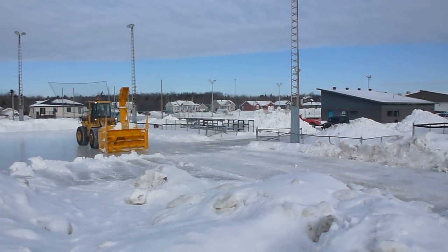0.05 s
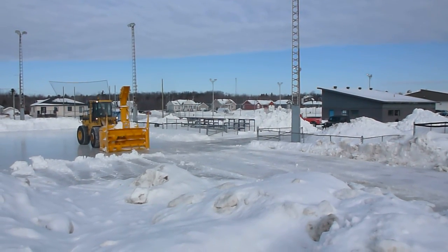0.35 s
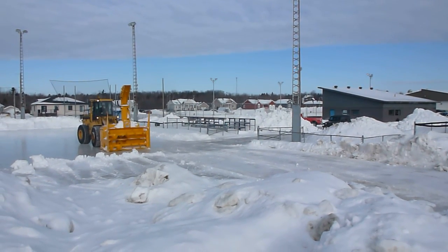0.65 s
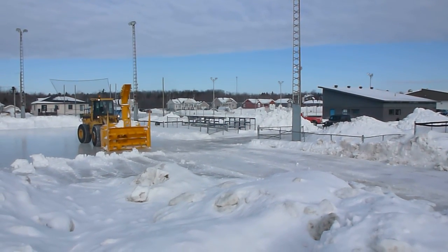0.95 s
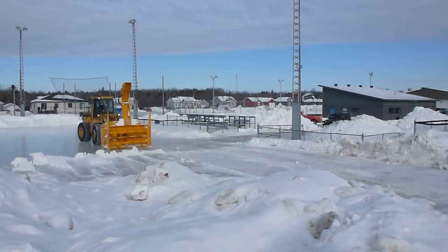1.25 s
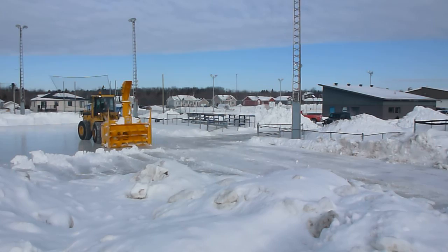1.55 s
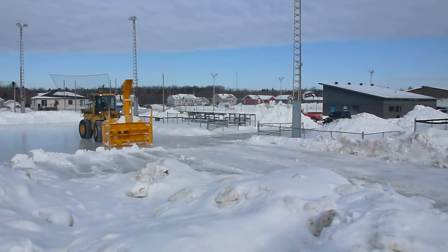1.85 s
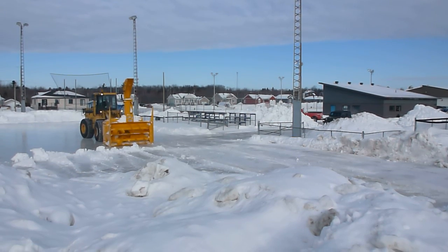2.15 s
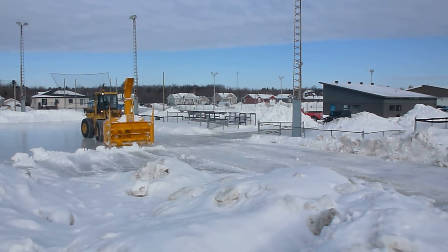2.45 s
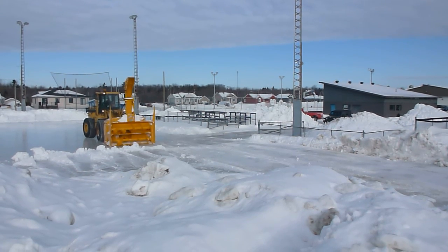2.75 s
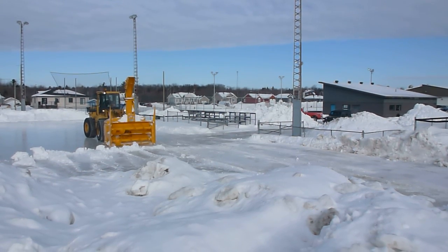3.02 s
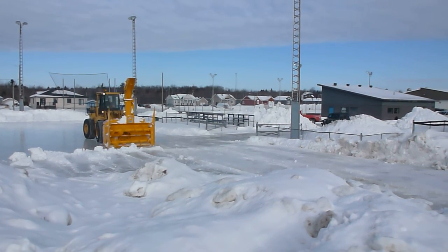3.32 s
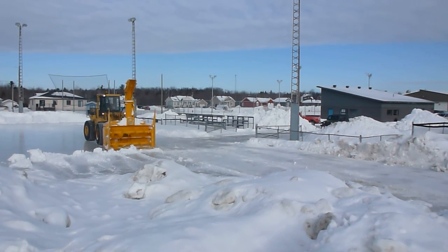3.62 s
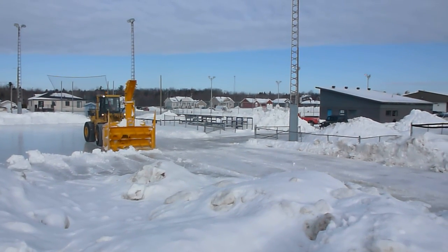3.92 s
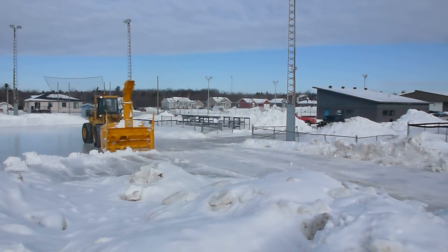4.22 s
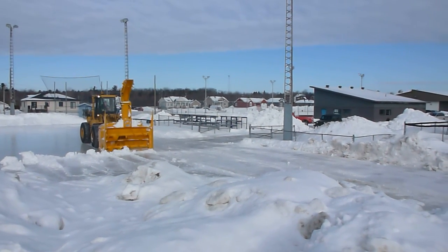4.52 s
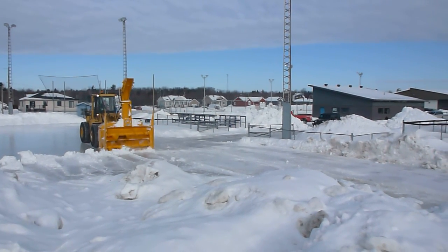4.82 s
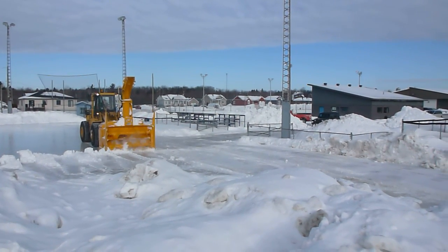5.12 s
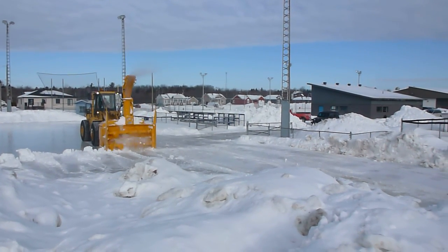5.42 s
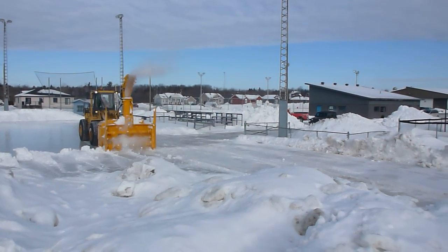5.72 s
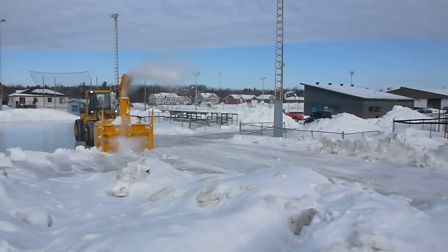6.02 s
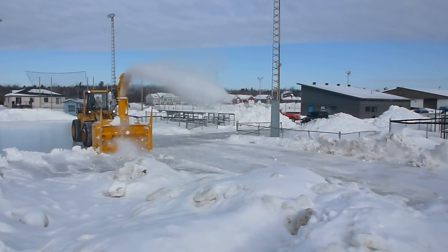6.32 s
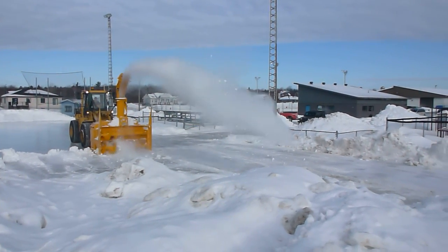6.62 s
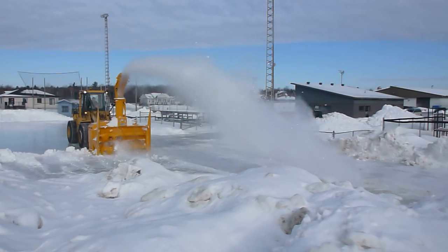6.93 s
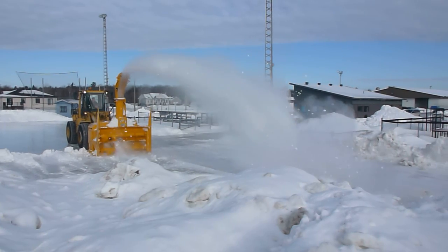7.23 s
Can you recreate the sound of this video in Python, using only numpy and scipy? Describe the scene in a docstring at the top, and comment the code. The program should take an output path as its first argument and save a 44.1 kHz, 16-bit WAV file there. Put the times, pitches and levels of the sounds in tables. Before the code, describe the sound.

A diesel snow blower on a wheel loader runs at full speed on an outdoor ice rink, straight ahead and some way off. Its drone throbs quickly throughout, with a rough clatter and thin, wavering whines. The cutting edge hisses faintly over the ice, briefly louder and brighter around 2 seconds. Stray ice lumps tick against steel at about 0.9, 1.5, 2.4 and 3.4 seconds.

At about 4.7 seconds the auger bites into a snowbank. A loud, gritty hiss of snow leaving the chute starts suddenly, over hollow churning that swells into short howls as thick wads pass through. Lumps crack against the metal more often. The engine pitch sags slightly, lowest near 5.7 seconds, and recovers by 6.6 seconds. The rushing spray and drone continue until the end at about 7.5 seconds. The highest treble is dulled.

```python
"""A diesel snow blower on a wheel loader runs at full speed across an ice rink, some way off.
Its exhaust and cooling fan drone and throb against each other while the cutting edge scrapes
over the ice and stray lumps hit the steel. Then the auger, the screw that feeds snow in, bites
into a snowbank: the engine sags, and snow and lumps rush through the chute."""
import sys
import numpy as np
from scipy import signal
from scipy.fft import rfft, irfft, next_fast_len
from scipy.io import wavfile
from scipy.ndimage import uniform_filter1d

SR = 44100
rng = np.random.default_rng(int(sys.argv[2]) if len(sys.argv) > 2 else 0)


def to_wav(sig):
    """Store sig (one row per channel, or 1-D mono) as 16-bit WAV at the path in sys.argv[1].

    Samples outside -1..1 are clipped; the rate is SR.
    """
    pcm = np.clip(np.atleast_2d(sig), -1, 1) * 32767
    pcm = np.round(pcm).astype(np.int16)
    wavfile.write(sys.argv[1], SR, pcm.T)  # frames by channels


N = 329427
T = np.arange(N) / SR
BITE_S = 4.67  # the auger meets the snowbank


def amp(db):
    """Turns decibels into a number to multiply by."""
    return 10 ** (np.asarray(db) / 20)


def unit(x):
    """Scales x to an average strength (rms) of 1."""
    return x / np.sqrt(np.mean(x ** 2) + 1e-20)


def curve(rows):
    """Joins (time_s, value) rows with straight lines."""
    return np.interp(T, *np.transpose(rows))


def shape(points, hz):
    """The gain at each pitch, read from (pitch_hz, gain_db) rows."""
    pitch_hz, gain_db = np.transpose(points)
    return amp(np.interp(np.log(hz + 1), np.log(pitch_hz), gain_db))


def colour(x, points):
    """Turns the pitches in x up or down by (pitch_hz, gain_db) rows."""
    size = next_fast_len(N)
    return irfft(rfft(x, size) * shape(points, np.fft.rfftfreq(size, 1 / SR)), size)[..., :N]


def wander(rate_hz):
    """A smooth random drift of strength 1, changing up to about rate_hz times a second."""
    size = 4096
    hz = np.fft.rfftfreq(size, T[-1] / size)
    slow = irfft(rfft(rng.standard_normal(size)) / (1 + (hz / rate_hz) ** 4))
    return unit(np.interp(T, np.linspace(0, T[-1], size), slow))


def swell(peak_s, half_length_s):
    """A smooth rise to 1 and back."""
    return np.exp(-((T - peak_s) / half_length_s) ** 2)


def rush(points, patchy_db):
    """Gusty noise in three rows: direct, scattered left and scattered right."""
    _, _, spectrum = signal.stft(rng.standard_normal((3, N)), SR, nperseg=512)
    patches = uniform_filter1d(rng.standard_normal(spectrum.shape[1:]), size=8, axis=0)  # 700 Hz wide
    patches = uniform_filter1d(patches, size=7, axis=1)  # 40 ms long
    gusty = signal.istft(spectrum * amp(patchy_db * unit(patches)), SR, nperseg=512)[1][:, :N]
    return unit(colour(gusty, points))


def blower_load(fill_s=1.3):
    """How full the blower is: 0 until the bite, then rising steadily to 1."""
    return np.clip((T - BITE_S) / fill_s, 0, 1)


def auger(turns):
    """Swings between -1 and 1 with each turn of the auger, about three times a second."""
    return np.cos(2 * np.pi * turns * .0681)


def rotor(turns, tones, fade_db, rough, smear):
    """One pulse a turn makes a stack of tones that fade in the wind; high ones flutter most."""
    load, out = blower_load(), np.zeros(N)
    for multiple, level_db, load_change_db in tones:
        angle = 2 * np.pi * multiple * turns + smear * multiple ** 2 * rng.standard_normal()
        level = amp(level_db + load_change_db * load + fade_db * wander(2.0))
        flutter = rough * multiple * (1 + 1.2 * load)
        tone = (1 + flutter * wander(9.3)) * np.sin(angle)
        out -= level * (tone + flutter * wander(16) * np.cos(angle))
    return out


# How fast the blower's engine turns: time_s, turns_per_s
ENGINE_SPEED = [(0, 46.2), (3, 46.36), (3.5, 46.27), (4.75, 46.41), (5.7, 45.48), (6, 45.72), (6.65, 46.75),
                (7.15, 46.68), (7.47, 46.14)]
def engine_speed():
    """The engine sags in the snowbank, then its speed control overshoots."""
    return curve(ENGINE_SPEED)


# The exhaust's tones: times_engine_speed, level_db, load_change_db
EXHAUST_TONES = [(1, -41.5, 1.5), (2, -33.5, -3), (3, -29.5, -2), (4, -30, -5.5), (5, -28, -0.5),
                 (6, -24.5, -11), (7, -58, 4), (8, -40, 3.5), (9, -51.5, 1), (10, -39.5, -9),
                 (11, -45.5, 7), (12, -43, -6), (14, -42.5, -6.5), (15, -51, 6.5)]
def exhaust(turns):
    """Puffs of exhaust blend into a drone that gets quieter when the engine slows."""
    speed_change = engine_speed() - np.median(engine_speed())
    return rotor(turns, EXHAUST_TONES, fade_db=0.68, rough=0.016, smear=0.012) * amp(2.9 * speed_change)


# The fan's tones: times_fan_speed, level_db, load_change_db
FAN_TONES = [(4, -46.5, 2.5), (5, -23, -10.5), (8, -40.5, 2), (10, -45.5, -9)]
# The fan's slow rise and fall: time_s, gain_db
FAN_LOUDNESS = [(0, -0.5), (3.4, -2.5), (4.05, 2), (5.5, -0.5), (6.2, 2), (7.47, -3)]
def fan(turns):
    """The belt-driven fan runs just behind the engine, so they throb nine times a second."""
    blades = rotor(turns * .96, FAN_TONES, fade_db=-0.3, rough=0.028, smear=0.0028)
    return blades * amp(curve(FAN_LOUDNESS))


# The impeller drive's tones: times_impeller_speed, level_db, load_change_db
IMPELLER_TONES = [(22, -39.5, -15), (23, -47, -5.5), (26, -60.5, -7.5), (32, -56.5, -5), (35, -44, -10.5)]
def impeller(turns):
    """The drive of the wheel that throws the snow hums, turning once per five engine turns."""
    return rotor(turns * .2, IMPELLER_TONES, fade_db=2, rough=.006, smear=.01)


# The loader engine's tones: times_cycle_rate, level_db, load_change_db
LOADER_TONES = [(2, -58.5, -5), (3, -56.5, 0.5), (5, -55, 6.5), (6, -48, 0), (9, -47, 3.5),
                (10, -45.5, -6.5), (11, -35, 2), (12, -36.5, -3), (15, -45.5, 7)]
def loader_engine(cycle_hz=19.76):
    """The loader's own four-stroke engine hums at a steady speed."""
    return rotor(T * cycle_hz, LOADER_TONES, fade_db=-0.5, rough=0.0045, smear=0.1078)


def drone(turns):
    """All four hums together: the upper tones surge with the auger and the lowest one wavers."""
    puffs, blades = exhaust(turns), fan(turns)
    hum = puffs + blades + impeller(turns) + loader_engine()
    upper = colour(puffs + blades, [(140, -20), (225, -2.5), (280, 0), (500, -16)])
    lowest = colour(puffs, [(50, 0), (90, -21), (200, -59.5)])
    return hum - .24 * auger(turns) * upper + .45 * np.tanh(wander(7)) * lowest


# Whines of the gears and hydraulics: pitch_hz, level_db
WHINE_TONES = [(466.6, -44.5), (1857, -58.5), (2132, -60.5), (3768, -58.5)]
def whines():
    """Gears and hydraulics sing thin, wavering tones that sag with the engine."""
    speed = engine_speed() / engine_speed()[:N // 2].mean()
    out = np.zeros(N)
    for pitch_hz, level_db in WHINE_TONES:
        level = amp(level_db + 1.9 * wander(2.3)) * np.sqrt(2)
        wavering_hz = pitch_hz * speed * (1 + .002 * wander(12))
        out += level * np.sin(2 * np.pi * np.cumsum(wavering_hz) / SR)
    return out


# The tone colour of the engine's clatter: pitch_hz, gain_db
CLATTER_COLOUR = [(28, -105), (42, -74), (70, -70), (110, -61.5), (170, -58.5), (228, -55), (275, -56),
                  (400, -59), (650, -57), (850, -61.5), (1150, -69.5), (1500, -69.5), (2500, -76),
                  (7000, -82.5)]
# How bright the clatter is: time_s, treble_db
CLATTER_BRIGHTNESS = [(0, 1.8), (1.4, 1), (2.2, 2.5), (2.62, 1.5), (2.72, -1.5), (3.7, -1.5), (3.95, 0.2),
                      (4.6, -1.5)]
def clatter(turns):
    """Noise of burning fuel and the fan pulses with three firings a turn and rocks with the auger."""
    firing = 1 + 0.028 * np.cos(2 * np.pi * 3 * turns)
    noise = amp(-29) * rush(CLATTER_COLOUR, patchy_db=0.86) * unit(firing)
    treble = colour(noise, [(250, -23.5), (600, -7.5), (1200, -1)])
    return (noise + treble * (amp(curve(CLATTER_BRIGHTNESS)) - 1)) * amp(0.62 * auger(turns))


# The tone colour of ice against steel: pitch_hz, gain_db
ICE_COLOUR = [(1000, -24), (2400, -7), (3100, 1), (3800, 1), (5000, 3), (6000, 0.5), (7500, -4)]
def scrape(dig_s=1.75, rise_s=0.23, hold_s=0.18, fade_s=0.16):
    """The cutting edge hisses over the ice, louder and brighter the one time it digs in."""
    age = T - dig_s
    dig_db = 7 * np.clip(age / rise_s, 0, 1) * np.exp(-np.maximum(age - rise_s - hold_s, 0) / fade_s)
    slide_db = -38.5 - 0.32 * T + 0.76 * wander(4.3)
    hiss = rush(ICE_COLOUR, patchy_db=1.6)
    treble = colour(hiss, [(4500, -28), (5600, -8), (6500, 2.5)])
    return amp(slide_db + dig_db) * (hiss + 0.11 * dig_db * treble)


# Ice lumps hitting the steel: start_s, relative_level_db, fade_s
LUMP_HITS = [(0.932, -36, 0.0055), (1.505, -29, 0.0038), (2.418, -29, 0.003), (3.351, -32, 0.0031),
             (4.753, -33, 0.0047), (4.892, -26, 0.0063), (5.2, -28.5, 0.028), (5.535, -36, 0.06),
             (5.763, -23.5, 0.0082), (5.929, -28.5, 0.014), (6.397, -32, 0.014), (6.544, -34, 0.0076),
             (6.735, -29.5, 0.012), (7.057, -29, 0.018)]
def lumps(rise_s=0.00031):
    """Each lump shatters on the steel in a short burst of noise."""
    bursts = np.zeros(N)
    for start_s, level_db, fade_s in LUMP_HITS:
        age = np.maximum(T - start_s, 0)
        bursts += amp(level_db + 6) * (1 - np.exp(-age / rise_s)) * np.exp(-age / fade_s)
    return bursts * rush(ICE_COLOUR, patchy_db=2.0)


# The tone colour of snow in the housing: pitch_hz, gain_db
CHURN_COLOUR = [(120, -22), (280, -7), (400, -7), (510, 2), (620, -4), (700, -1.5), (765, 4.5), (840, -4),
                (950, -3), (1130, -17), (2000, -28)]
# Thick wads of snow passing through: peak_s, rise_db, half_length_s
SNOW_WADS = [(4.894, 6, 0.085), (5.094, 4.5, 0.044), (5.35, 5, 0.075), (5.55, 5.5, .1), (6.238, 6, 0.11),
             (6.6, 4, .08), (7.135, 3.5, 0.033), (7.286, 6, 0.027)]
def churn(clumps_db):
    """Snow churns in the housing, and each thick wad makes the impeller howl."""
    wads_db = sum(rise_db * swell(peak_s, half_s) for peak_s, rise_db, half_s in SNOW_WADS)
    return amp(-32 + wads_db + clumps_db) * rush(CHURN_COLOUR, patchy_db=0.94)


def grit(per_s, spread_db, fade_s=0.0043):
    """The loudness of a stream of ice grains, each a brief flare over the steady rush."""
    sizes = amp(spread_db * np.minimum(rng.exponential(1, N), 4))
    grains = sizes * (rng.random(N) < per_s / SR)
    flares = signal.lfilter([1], [1, -np.exp(-1 / (fade_s * SR))], 0.23 * grains ** 2)
    return unit(np.sqrt(1 + flares))


# The tone colour of snow leaving the chute: pitch_hz, gain_db
SPRAY_COLOUR = [(700, -20), (1130, -7.5), (1350, 0.5), (1750, -2.5), (2050, -5), (2400, -2), (2750, -2.5),
                (3080, 3), (3600, 0), (4600, -0.5), (5400, -2), (5850, -1), (6200, -2), (7500, -4)]
def spray(turns, clumps_db, echo_s=.0017, lag_s=0.099):
    """Snow hisses out of the chute, swelling with each lump and each push of the auger."""
    hiss = rush(SPRAY_COLOUR, patchy_db=1.1) * grit(per_s=170, spread_db=2.5)
    echo = np.roll(hiss, round(echo_s * SR))  # off the steel wall
    lumps_db = 2.5 * sum(swell(start_s, 1.9 * fade_s) for start_s, _, fade_s in LUMP_HITS)
    push_db = 0.34 * np.interp(T - lag_s, T, auger(turns))
    steady_db = -25 - blower_load()  # a little quieter once packed full
    return amp(steady_db + push_db + lumps_db + clumps_db) * (hiss + 0.088 * echo)


def snow(turns, rise_s=0.08):
    """Once the auger bites, snow churns and sprays in the same uneven clumps."""
    bite = np.clip((T - BITE_S) / rise_s, 0, 1)
    clumps_db = 0.5 * wander(38)
    return bite * (churn(clumps_db) + spray(turns, clumps_db))


# Narrow bands that each microphone opening changes, mostly dips: pitch_hz, width_hz, gain_db
LEFT_BANDS = [(2220, 1500, -6), (2620, 380, -11), (3460, 400, -7.5)]
RIGHT_BANDS = [(2040, 380, 1), (3485, 400, -7), (3890, 790, -22), (4330, 250, -8), (4890, 300, -6)]
def microphones(direct, left_delay_s=2.2e-5):
    """Two small microphone openings each colour the sound; the left hears slightly later."""
    size = next_fast_len(N)
    f = np.fft.rfftfreq(size, 1 / SR)

    def band(hz, width, gain):
        return (hz ** 2 - f ** 2 + 1j * f * width * gain) / (hz ** 2 - f ** 2 + 1j * f * width)

    left, right = (np.prod([band(hz, width, amp(db)) for hz, width, db in side], axis=0)
                   for side in (LEFT_BANDS, RIGHT_BANDS))
    left *= np.exp(-2j * np.pi * f * left_delay_s)
    left *= shape([(300, 0), (600, -.8), (1500, -1.4), (3500, .5), (7000, 0)], f)
    right *= band(hz=3340, width=190, gain=-.8)  # a hollow behind this opening flips the wave over
    return irfft(rfft(direct, size) * np.array([left, right]), size)[:, :N]


def scene(first_throb_s=.063):
    """The machine straight ahead, and a little of its noise scattered back by the snowbanks."""
    turns = np.cumsum(engine_speed()) / SR
    turns -= np.interp(first_throb_s, T, turns)  # a firing and a fan blade line up here
    noise = clatter(turns) + scrape() + snow(turns) + lumps()
    scattered = colour(noise[1:], [(40, -4.5), (200, -13), (700, -14), (1300, -22), (2400, -13),
                                   (3400, -14.5), (4400, -21), (6000, -24), (7400, -21.5), (8000, -13.5)])
    return microphones(drone(turns) + whines() + noise[0]) + scattered


# How the camera dulls the highest sounds: pitch_hz, gain_db
TREBLE_LOSS = [(6800, 1.5), (7300, -2.5), (7650, -11), (7850, -22.5), (8000, -43), (8200, -26), (8450, -20),
               (8700, -26.5), (8900, -35)]
def record(dry, top_hz=8900):
    """The camera softens the treble and cuts off everything above top_hz."""
    cutoff = signal.firwin(1023, top_hz, window=("kaiser", 9), fs=SR)
    return signal.oaconvolve(colour(dry, TREBLE_LOSS), cutoff[None], "same")


dry = scene()
out = record(dry)
to_wav(out)
```